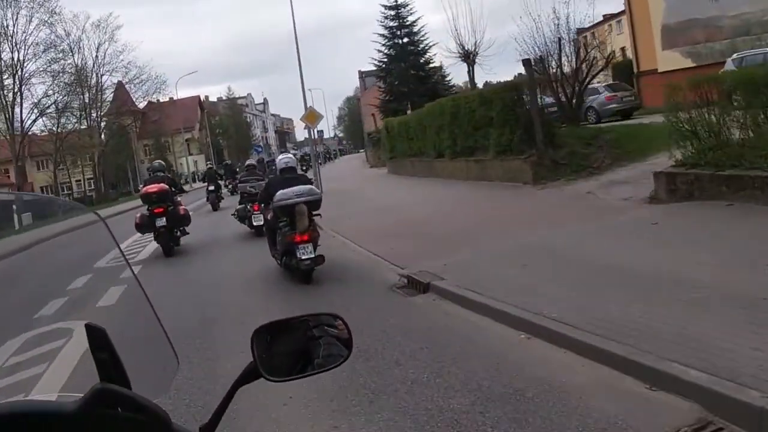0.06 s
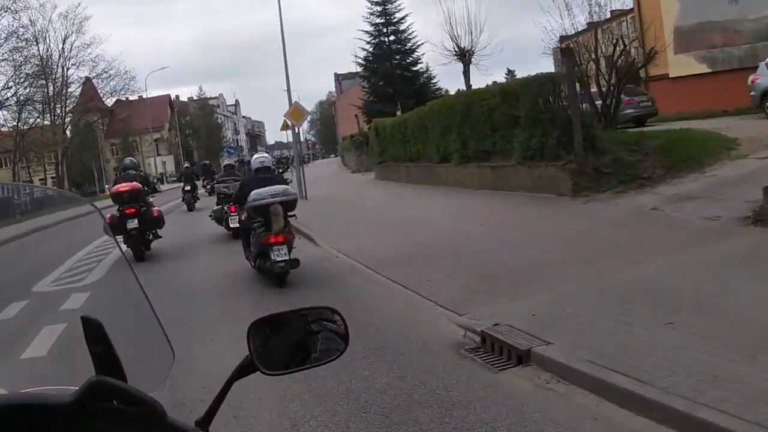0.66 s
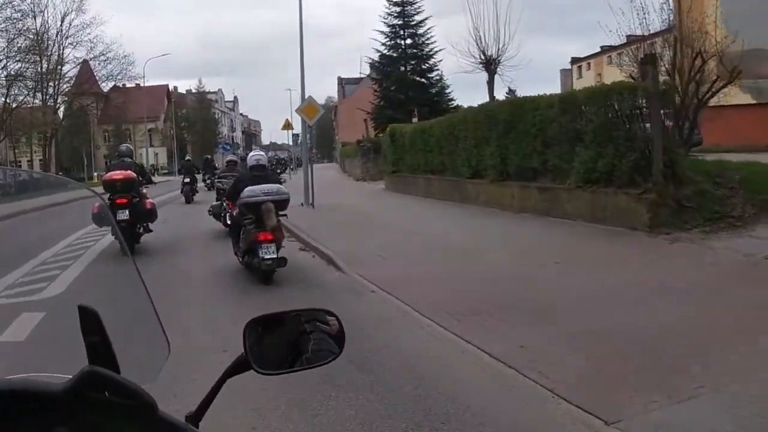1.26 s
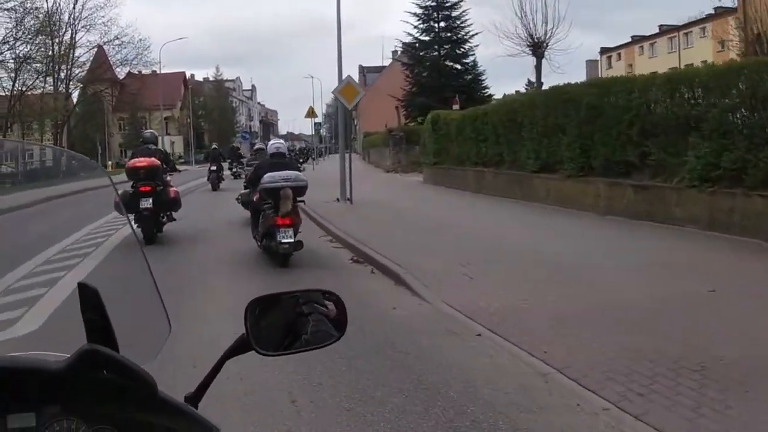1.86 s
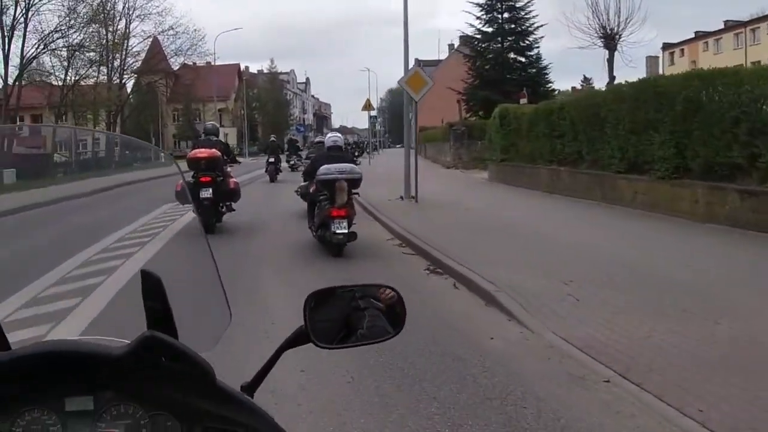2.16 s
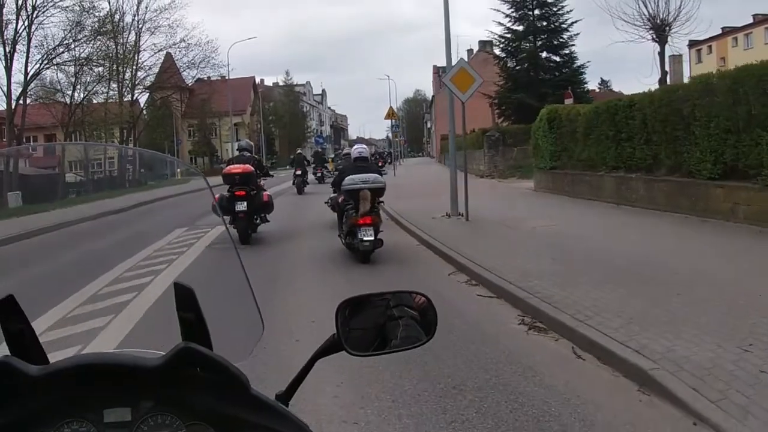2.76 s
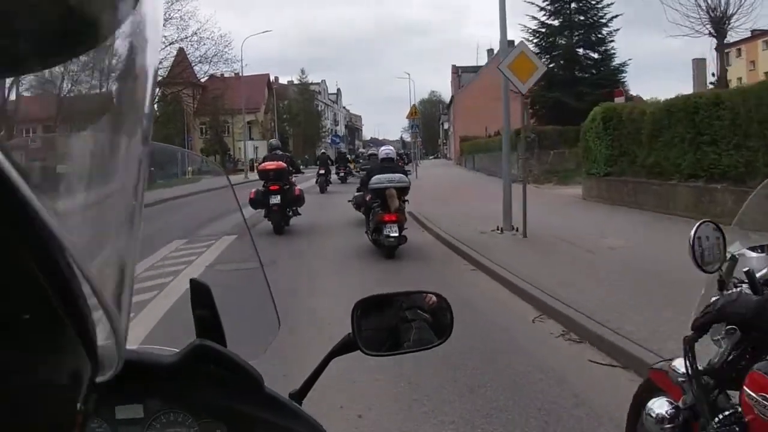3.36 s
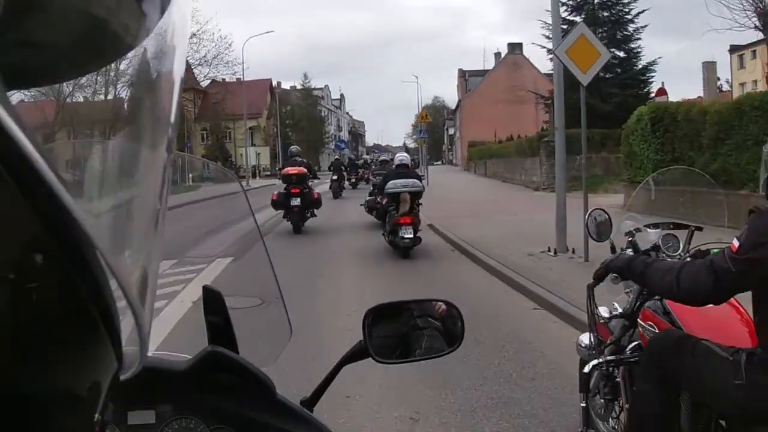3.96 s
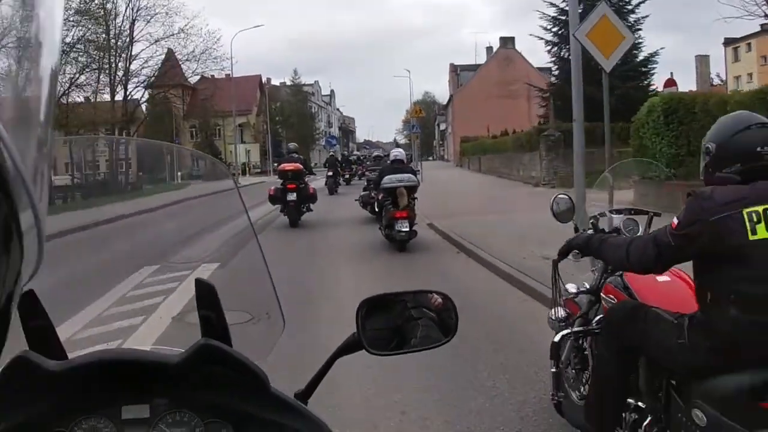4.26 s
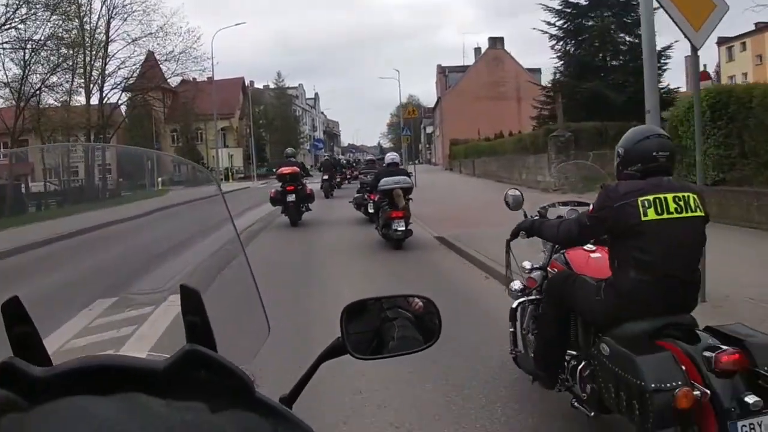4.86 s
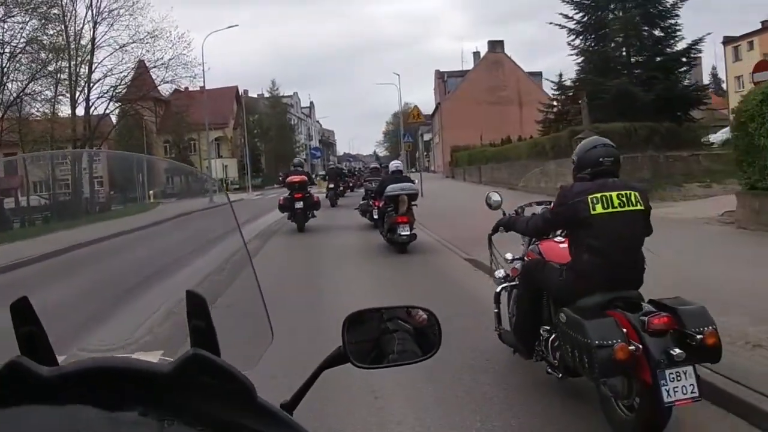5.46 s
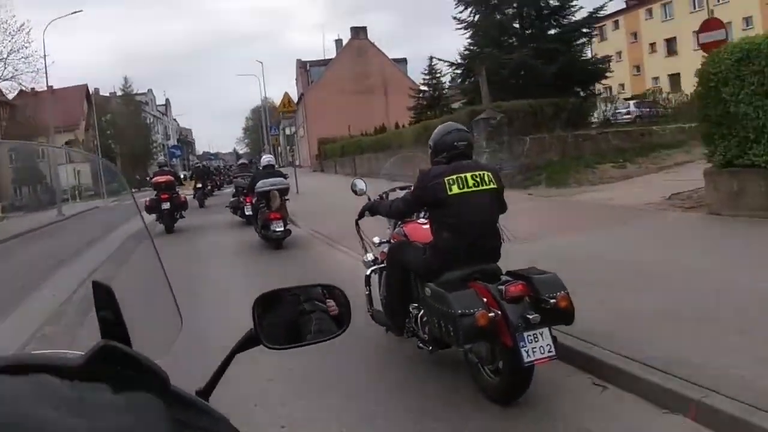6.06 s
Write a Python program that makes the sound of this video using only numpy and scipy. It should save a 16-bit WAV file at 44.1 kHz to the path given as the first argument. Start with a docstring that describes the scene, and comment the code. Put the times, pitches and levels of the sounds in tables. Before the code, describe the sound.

Big motorcycles throb and growl in a slow street convoy, one drawing close past, with wind buffeting the microphone.

```python
"""Big twin motorcycles throb through town in a slow convoy, heard from a camera worn by one rider.
Uneven exhaust pulses boom, growl and bark off the street: two twins close by, a pack further ahead.
The rider's own four-cylinder hums and its gears whine under load; bumps knock through the bodywork.
Behind them: wind on the housing, tyre roar, hiss, swishes, faint ticks. A limiter holds the peaks down."""
import sys
import numpy as np
from scipy import signal
from scipy.fft import rfft, irfft, next_fast_len
from scipy.io import wavfile
from scipy.ndimage import uniform_filter1d

SR = 44100
rng = np.random.default_rng(int(sys.argv[2]) if len(sys.argv) > 2 else 0)


def wrap_up_sound(samples):
    """Save the sound to the file named by the first command line argument, as 16-bit audio."""
    columns = np.atleast_2d(samples).T
    # keep every value between -1 and 1, then stretch to whole-number steps
    tamed = np.clip(columns, -1, 1)
    steps = np.round(tamed * 32767).astype(np.int16)
    wavfile.write(sys.argv[1], SR, steps)


N = 273861
TIME_S = np.arange(N) / SR

# spectra: freq_hz, gain_db
HISS_EQ = [(1500, -27), (3000, -0.5), (3600, -0.5), (4300, -1.5), (5000, 2), (5600, 0), (6200, -9),
           (7000, -16), (8300, -26), (12000, -26), (13000, -41), (14500, -53.5)]
SWISH_EQ = [(800, -17.5), (2000, -11.5), (3000, 2.5), (3700, 3), (4600, 1.5), (5600, -2), (6500, -14),
            (8000, -22.5), (11500, -26.5), (14000, -41.5)]
TYRE_EQ = [(100, -12), (500, 3), (800, 1), (1050, -1), (1350, -3), (1700, -4.5), (2100, -8.5), (3000, -13),
           (4500, -31.5), (7000, -47), (12000, -63)]
WIND_EQ = [(5, -30.5), (15, -7), (25, -9.5), (50, -5), (80, -2.5), (130, -4), (250, -23.5), (600, -53),
           (2000, -92.5)]
BOOM_EQ = [(10, -41), (50, -11.5), (95, 1), (125, 3), (155, -0.5), (190, 1), (215, 0), (240, -3.5),
           (270, -12), (330, -28), (400, -26.5), (600, -40.5), (1500, -85.5)]
BARK_EQ = [(10, -68.5), (120, -24), (210, -5.5), (255, 1), (305, 3.5), (345, -5), (400, -15.5), (570, -28),
           (720, -37.5), (1200, -40.5), (2500, -49), (6000, -86)]
GROWL_EQ = [(100, -50), (280, -13.5), (360, 5), (420, 2.5), (490, -0.5), (580, -5), (720, -20.5),
            (1200, -28.5), (3000, -62)]
THUMP_EQ = [(10, -43.5), (50, -15), (80, -4.5), (105, 4.5), (130, -1.5), (160, -2), (205, -6), (250, -23.5),
            (500, -41.5), (1500, -89)]
RASP_EQ = [(100, -43), (330, 2), (440, 4), (505, -8), (580, 0), (680, -3.5), (760, -20.5), (1300, -18.5),
           (4000, -75.5)]

# faint ticks: time_s, level_db
TICKS = [(0.62, -71), (0.818, -68), (0.914, -68), (1.096, -68), (1.176, -67), (1.258, -63), (1.355, -70),
         (1.434, -68), (1.516, -66.5), (1.672, -68), (2.03, -67)]
# close swishes: centre_s, length_s, level_db
SWISHES = [(0.04, 0.29, -43), (0.19, 0.22, -44.5), (2.36, 0.28, -49.5), (3.43, 0.094, -51),
           (4.255, 0.38, -52), (5.889, 0.058, -50)]
# whistles and narrow hisses: centre_s, length_s, pitch_hz, width_hz, level_db
WHISTLES = [(0.125, 0.27, 3490, 40, -54.5), (1.277, 0.26, 10500, 2110, -69), (2.35, 0.22, 3480, 55, -58),
            (2.68, 1.8, 1914, 626, -48), (3.426, 0.86, 2600, 588, -52), (4.242, 0.36, 2060, 480, -50),
            (5.306, 0.83, 3880, 280, -54), (5.305, 0.59, 3154, 301, -57.5), (4.84, 1, 1253, 50, -51),
            (5.892, 0.062, 5100, 1010, -47.5), (6.15, 1.0, 1137, 344, -44.5)]
# dip in the hiss, passing twin alongside: centre_s, length_s, gain_db
HISS_LULL = (4.35, 1.9, -2)
# rough and smooth tarmac: centre_s, length_s, gain_db
TARMAC = [(0.095, 1.2, 3.3), (3.699, 1.3, -1.5)]
# gusts: centre_s, length_s, relative_db
GUSTS = [(0.08, 0.52, -25.5), (1.25, 1, -24), (1.95, 1, -18.5), (2.45, 0.62, -20), (3.1, 1, -17),
         (3.85, 0.92, -20.5), (4.48, 0.73, -21), (5.25, 0.4, -24), (5.88, 0.55, -20)]
# road bumps: start_s, gain_db, rattle_share, pitch_ratio, ring_time_ratio
BUMPS = [(.3134, 1, 0.16, 1.03, .7), (0.336, -25, 0.7, 1.3, 1), (.39, -22, .1, 1, 1),
         (0.7578, -4.5, .06, 1, 1.3), (0.7693, -5.5, 0.07, 1, .9), (3.377, -18, .3, 1, 1),
         (3.541, -13.5, .08, .9, 1.3), (6.164, -13.5, .15, .95, 1.2)]
# bodywork modes: freq_hz, gain_db, t60_s
BODY_MODES = [(305, 5.5, 0.021), (513, 4.5, 0.017), (692, 3.5, 0.011), (865, -2, 0.0089),
              (1094, -7.5, 0.0094), (1430, -14, 0.0088)]
# brief scuff: centre_s, length_s, level_db
SCUFF = (0.48, 0.085, -42)
# own four-cylinder: time_s, firing_hz, hum_db
OWN_ENGINE = [(0, 102, -26), (.45, 102, -34), (.8, 104, -24.5), (1.15, 94, -23.5), (1.3, 86, -27),
              (1.6, 76, -38), (1.9, 75, -27), (2.1, 74, -36), (2.55, 87, -32), (3.0, 74, -32),
              (3.2, 62, -25), (3.4, 60, -26), (3.65, 93, -27), (3.95, 90, -23), (4.2, 96, -21),
              (4.4, 94, -20), (4.62, 69, -29), (4.78, 75, -23), (5.05, 96, -20), (5.24, 104, -17.5),
              (5.5, 97, -20), (5.8, 74, -22.5), (5.95, 67, -26), (6.21, 65, -30)]
# gears under load: centre_s, length_s, whine_db
GEAR_LOADS = [(1.15, 0.6, -53), (2.72, 1.0, -50.5), (4.23, .34, -49), (4.77, .52, -48.5), (5.15, .6, -51),
              (5.77, 0.56, -47.3)]
# nearest twin: time_s, crank_hz, order4_db, order5_db
CRUISER = [(0, 42.4, -32, -27), (.25, 42.4, -23, -26), (.43, 41, -15.5, -22), (.65, 39.8, -16.5, -24),
           (.82, 40.8, -24, -24), (1.0, 41.6, -20, -18), (1.25, 43.6, -27, -28), (1.45, 41.1, -21.5, -32),
           (1.8, 41.3, -34, -30), (2.15, 43.6, -21, -26), (2.5, 43.4, -32, -25.5), (2.9, 42.8, -34, -28),
           (3.08, 42, -32, -32), (3.22, 40.5, -16.5, -31), (3.33, 42, -20, -26), (3.45, 42.4, -38, -25),
           (3.85, 40, -29, -38), (4.2, 41, -31, -30), (5.0, 40.6, -30, -27), (5.35, 40.8, -26, -24),
           (5.65, 42.2, -30, -31), (5.95, 41.6, -28, -27), (6.21, 41.2, -29, -26)]
# twin that slows, then draws past: time_s, crank_hz, order2_db
PASSER = [(0, 78, -22), (.18, 78, -17), (.32, 74, -17.5), (.5, 74, -23), (.75, 68, -21), (1.25, 66, -33),
          (1.8, 72, -26), (2.05, 77.5, -15), (2.35, 72.5, -24), (2.56, 77, -16.5), (2.8, 62.5, -18),
          (3.05, 58, -19), (3.3, 55, -33), (3.45, 53.5, -17), (3.62, 49.5, -19.5), (3.85, 47, -24),
          (4.3, 55, -27), (4.6, 54, -23), (4.83, 60, -18), (5.05, 63, -27), (5.55, 68, -26), (5.8, 52, -32),
          (5.98, 49.5, -17.5), (6.21, 49.5, -25)]
# boom at shut throttle, weaker as the pack draws ahead: time_s, level_db
BOOM_LEVEL = [(0, -18), (.25, -17), (1.0, -18.5), (1.7, -19.5), (2.1, -22.5), (2.7, -21), (3.3, -21.5),
              (3.9, -23.5), (4.7, -22), (5.2, -22), (6.21, -18)]
# exhaust growl: time_s, level_db
GROWL_LEVEL = [(0, -37.5), (.5, -32.5), (.62, -29), (.82, -27.5), (1.0, -35), (1.2, -29.5), (1.36, -38.5),
               (1.68, -41), (1.98, -30.5), (2.15, -37), (2.45, -32.5), (2.75, -32.5), (2.98, -30),
               (3.2, -30.5), (3.64, -32), (3.76, -39), (4.18, -38), (4.34, -31.5), (4.9, -33), (5.7, -33),
               (6.04, -38.5), (6.21, -30.5)]
# throttle openings: start_s, length_s, bark_db
THROTTLES = [(0.118, 0.47, -22), (0.597, 0.25, -21.5), (0.952, 0.3, -23.5), (1.73, 0.3, -25.5),
             (2.376, 1.26, -24), (4.174, 0.91, -24.5), (5.103, 0.34, -23), (5.45, 0.46, -26)]


def gain_of(db):
    """dB to amplitude."""
    return 10 ** (np.asarray(db) / 20)


def unit_rms(x):
    """Scale to rms 1."""
    return x / np.sqrt(np.mean(x ** 2) + 1e-20)


def curves(rows):
    """Timed table to one per-sample curve a column."""
    time_s, *columns = np.transpose(rows)
    return [np.interp(TIME_S, time_s, column) for column in columns]


def coloured(x, spectrum, size=16384):
    """Minimum-phase filter with the given spectrum; rms 1."""
    hz, db = np.transpose(spectrum)
    bins_hz = abs(np.fft.fftfreq(size, 1 / SR))
    log_gain = np.log(gain_of(np.interp(np.log(bins_hz + 1), np.log(hz), db)))
    taps = np.fft.ifft(np.exp(np.conj(signal.hilbert(log_gain)))).real[:size // 2]
    return unit_rms(signal.fftconvolve(x, taps)[:N])


def drift(rate_hz):
    """Low-passed noise; rms 1."""
    size = next_fast_len(N, real=True)
    lowpass = np.exp(-(np.fft.rfftfreq(size, 1 / SR) / rate_hz) ** 2)
    return unit_rms(irfft(rfft(rng.standard_normal(size)) * lowpass, size)[:N])


def noise_band(hz, width_hz):
    """Noise around a steady or moving pitch; rms 1."""
    phase_rad = 2 * np.pi * np.cumsum(hz * np.ones(N)) / SR
    return unit_rms(drift(width_hz) * np.cos(phase_rad) + drift(width_hz) * np.sin(phase_rad))


def swell(centre_s, length_s):
    """Half-cosine rise and fall, 0-1."""
    return np.cos(np.pi * np.clip((TIME_S - centre_s) / length_s, -.5, .5))


def swells(rows):
    """Summed amplitude of several swells."""
    return sum(gain_of(db) * swell(centre_s, length_s) for centre_s, length_s, db in rows)


def lift_db(centre_s, length_s, db):
    """Passing change of level."""
    return db * swell(centre_s, length_s)


def decaying(pulses, decay_s):
    """Exponential tail on each pulse; rms 1."""
    return unit_rms(signal.lfilter([1], [1, -np.exp(-1 / (decay_s * SR))], pulses))


def ticks(edge_s=.006):
    """Tiny, soft bursts of high hiss."""
    envelope = sum(gain_of(db) * np.exp(-abs(TIME_S - time_s) / edge_s) for time_s, db in TICKS)
    return envelope * noise_band(11300, width_hz=1900)


def swishes():
    """Brief uneven hisses and thin whistles."""
    out = swells(SWISHES) * gain_of(drift(60)) * coloured(rng.standard_normal(N), SWISH_EQ)
    for centre_s, length_s, pitch_hz, width_hz, db in WHISTLES:
        out += gain_of(db) * swell(centre_s, length_s) * noise_band(pitch_hz, width_hz)
    return out


def hiss(throttle, base_db=-53.5, throttle_db=1.27):
    """Flickering hiss that rises with the throttle."""
    level_db = base_db + lift_db(*HISS_LULL) + throttle_db * throttle + 0.7 * drift(28)
    return gain_of(level_db) * coloured(rng.standard_normal(N), HISS_EQ)


def tyres(pulses, base_db=-41.5):
    """Tyre roar on changing tarmac, with clatter at each firing."""
    clatter = 1 + 0.088 * decaying(pulses, decay_s=0.0029)
    level_db = base_db + sum(lift_db(*patch) for patch in TARMAC)
    return gain_of(level_db) * coloured(rng.standard_normal(N) * clatter, TYRE_EQ)


def wind(breeze_db=-22, gust_trim_db=-3):
    """Breeze and gusts buffet the camera housing."""
    envelope = gain_of(breeze_db) + gain_of(gust_trim_db) * swells(GUSTS)
    return envelope * gain_of(0.2 * drift(3.1)) * coloured(rng.standard_normal(N), WIND_EQ)


def knocks(contact_s=0.00095, rattle_t60_s=0.27):
    """Bumps thud through plastic bodywork and shake out a rattle; one brief scuff."""
    out = np.zeros(N)
    rattle = noise_band(2350, width_hz=600) * gain_of(3 * drift(90))
    for start_s, db, rattle_share, pitch_ratio, ring_ratio in BUMPS:
        start = round(start_s * SR)
        span = slice(start, start + SR // 5)
        t = TIME_S[span] - TIME_S[start]
        ring = sum(gain_of(mode_db - 60 * t / (t60_s * ring_ratio))
                   * np.sin(2 * np.pi * hz * pitch_ratio * t) for hz, mode_db, t60_s in BODY_MODES)
        shake = rattle_share * gain_of(-28 - 60 * t / rattle_t60_s) * rattle[span]
        padded_onset = 1 - np.exp(-(t / contact_s) ** 2)
        out[span] += gain_of(db) * padded_onset * (.5 * ring + shake)
    return out + swells([SCUFF]) * noise_band(800, width_hz=500)


def order_tone(cycles, order, db, waver_hz=12, waver_depth=.22, waver_rad=.17):
    """One engine order; uneven burning shakes its level and phase."""
    phase_rad = 2 * np.pi * (order * cycles + rng.random()) + waver_rad * drift(waver_hz)
    return np.sqrt(2) * gain_of(db) * (1 + waver_depth * drift(waver_hz)) * np.sin(phase_rad)


def four_cylinder(gear_teeth=19):
    """Even firing: a hum, a weak beat every four firings, a gear whine locked to the speed."""
    firing_hz, hum_db = curves(OWN_ENGINE)
    firing_hz = uniform_filter1d(firing_hz, size=5000, mode="nearest")
    fired = np.cumsum(firing_hz) / SR
    hum = order_tone(fired, 0.99, hum_db) + order_tone(fired, 2, hum_db - 10.5)
    beat = order_tone(fired / 4, 0.99, hum_db - 17)
    mesh_hz = firing_hz * gear_teeth
    whine = .8 * noise_band(mesh_hz, width_hz=78) + .6 * noise_band(mesh_hz, width_hz=300)
    return hum + beat + swells(GEAR_LOADS) * whine


def street(x, wet_db, t60_s, echoes_per_s=900):
    """Add echoes off tarmac and houses; the pattern changes as the bikes roll on."""
    t, hop = TIME_S[:SR // 2], SR // 4
    fade = signal.windows.cosine(2 * hop)
    padded, echoes = np.pad(x, (hop, 2 * hop)), np.zeros(N + 2 * SR)
    for at in range(0, N + hop, hop):
        taps = rng.standard_normal(len(t)) * (rng.random(len(t)) < echoes_per_s / SR)
        taps *= gain_of(-60 * t / t60_s)
        block = signal.fftconvolve(fade * padded[at:at + 2 * hop], taps / np.linalg.norm(taps))
        echoes[at:at + len(block)] += block
    return x + gain_of(wet_db) * echoes[hop:hop + N]


def opening(start_s, length_s, open_s=0.085, close_s=0.14):
    """Throttle twisted open, held, rolled off; 0-1."""
    t = TIME_S - start_s
    return np.clip(t / open_s, 0, 1) - np.clip((t - length_s) / close_s, 0, 1)


def firings(turns, offset_cycles, spread):
    """A twin fires twice in two crank turns, unevenly spaced, with jitter in time and strength."""
    pulses = np.zeros(N)
    cycles = (turns + .03 * drift(25)) / 2
    for offset in (0, offset_cycles):
        at = np.flatnonzero(np.diff(np.floor(cycles + offset)) > 0)
        pulses[at] += 1 + spread * rng.uniform(-1, 1, N)[:len(at)]
    return unit_rms(pulses)


def pack_firings():
    """Four twins ahead, each at its own wandering speed; rms 1."""
    cranks_hz = [hz * (1 + .07 * drift(.8)) for hz in np.linspace(44, 70, num=4)]
    turns = (np.cumsum(hz) / SR + 2 * rng.random() for hz in cranks_hz)
    return unit_rms(sum(firings(crank, offset_cycles=.4, spread=0.39) for crank in turns))


def pipes(blasts, gas, throttle, throttle_boom_db=1, coast_bark_db=-30.5):
    """Exhaust pipes boom and growl, and bark as the throttles open."""
    boom_db = curves(BOOM_LEVEL)[0] + throttle_boom_db * throttle
    bark_db = coast_bark_db + sum((db - coast_bark_db) * opening(start_s, length_s)
                                  for start_s, length_s, db in THROTTLES)
    growl_db = curves(GROWL_LEVEL)[0]
    boom = coloured(street(blasts + 0.27 * gas, wet_db=-12, t60_s=0.8), BOOM_EQ)
    bark = coloured(street(blasts + 0.8 * gas, wet_db=-6, t60_s=0.13), BARK_EQ)
    growl = coloured(street(.5 * blasts + gas, wet_db=-1.5, t60_s=0.34), GROWL_EQ)
    return gain_of(boom_db) * boom + gain_of(bark_db) * bark + gain_of(growl_db) * growl


def pass_by(pulses, gas):
    """The passing twin thumps alongside, then rasps once its pipes face the microphone."""
    thump = swell(centre_s=4.65, length_s=3.66) * coloured(pulses + 0.14 * gas, THUMP_EQ)
    rasp = swell(centre_s=5.63, length_s=1.58) * coloured(pulses + 0.38 * gas, RASP_EQ)
    return gain_of(-21.5) * thump + gain_of(-35.5) * rasp


def twins(throttle):
    """Exhaust blasts, each trailing turbulent gas, plus drones; returns sound and near firing pulses."""
    cruiser_hz, order4_db, order5_db = curves(CRUISER)
    passer_hz, order2_db = curves(PASSER)
    cruiser_turns = np.cumsum(cruiser_hz * (1 + .006 * drift(12))) / SR
    passer_turns = np.cumsum(passer_hz * (1 + .008 * drift(15))) / SR
    passer_pulses = firings(passer_turns, offset_cycles=.44, spread=0.4)
    cruiser_pulses = firings(cruiser_turns, offset_cycles=.4, spread=0.41)
    near_pulses = 0.8 * cruiser_pulses + 0.81 * passer_pulses
    blasts = unit_rms(near_pulses + gain_of(-0.5) * pack_firings())
    gas = decaying(blasts, decay_s=0.0058) * rng.standard_normal(N)
    exhaust = pipes(blasts, gas, throttle) + pass_by(passer_pulses, gas)
    drones = order_tone(cruiser_turns, 4, order4_db) + order_tone(cruiser_turns, 5, order5_db)
    drones += order_tone(passer_turns, 0.98, order2_db - 12.5) + order_tone(passer_turns, 2, order2_db)
    return exhaust + drones, near_pulses


def scene():
    """Mono mix at the camera."""
    throttle = sum(opening(start_s, length_s) for start_s, length_s, _ in THROTTLES)
    exhausts, near_pulses = twins(throttle)
    engines = exhausts + four_cylinder()
    rush = wind() + tyres(near_pulses) + hiss(throttle)
    return (engines + rush + swishes() + knocks() + ticks())[None]


def record(dry, threshold_db=-6, release_db_per_s=90, cutoff_hz=14500):
    """Fast peak limiter, short end fades, low-pass."""
    peak_db = 20 * np.log10(abs(dry[0]) + 1e-9)
    release_db = TIME_S * release_db_per_s
    held_db = np.maximum.accumulate(peak_db + release_db) - release_db
    over_db = np.maximum(held_db - threshold_db, 0)
    smoother = signal.windows.hann(301)
    limited = dry / gain_of(signal.fftconvolve(over_db, smoother / smoother.sum(), "same"))
    faded = limited * signal.windows.tukey(N, .001)
    return signal.sosfilt(signal.butter(12, cutoff_hz, fs=SR, output="sos"), faded)


dry = scene()
out = record(dry)
wrap_up_sound(out)
```